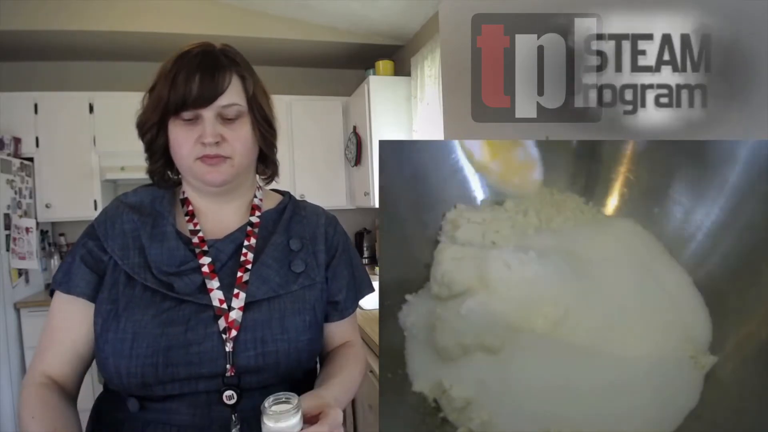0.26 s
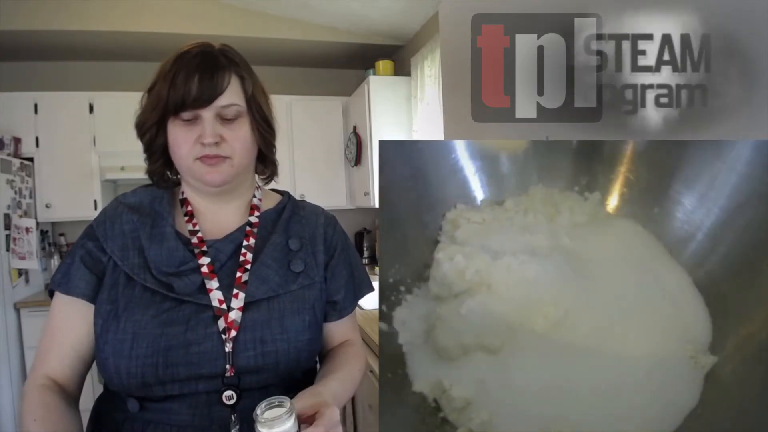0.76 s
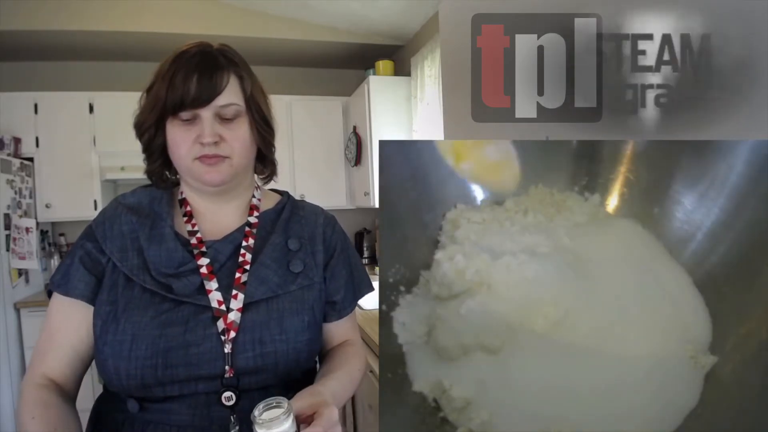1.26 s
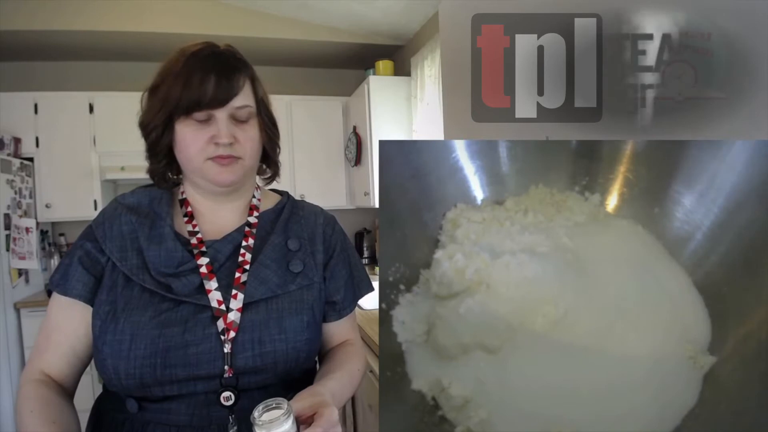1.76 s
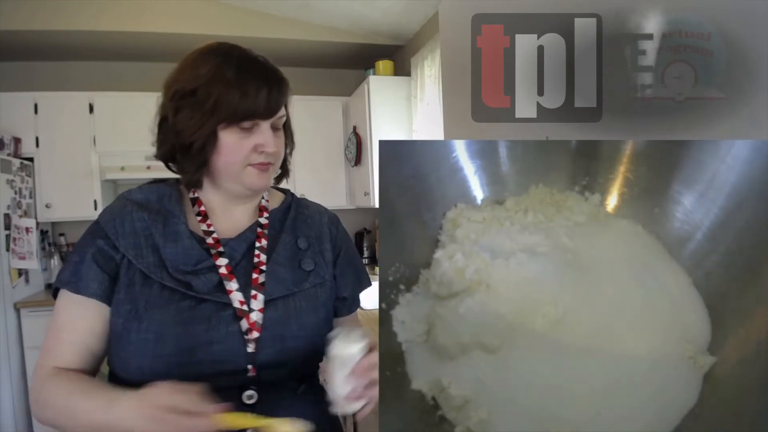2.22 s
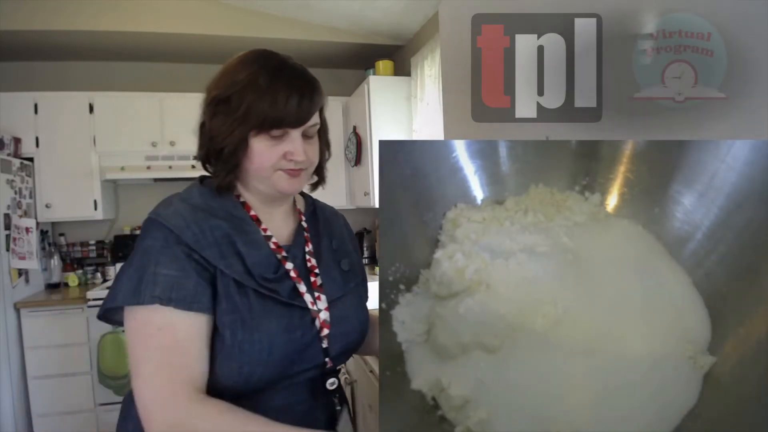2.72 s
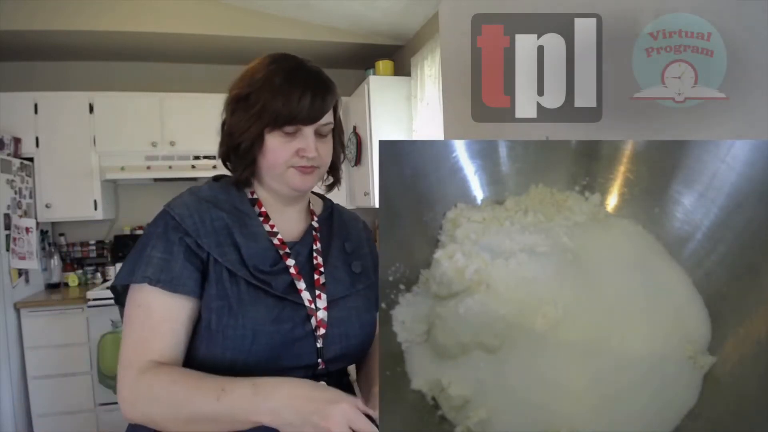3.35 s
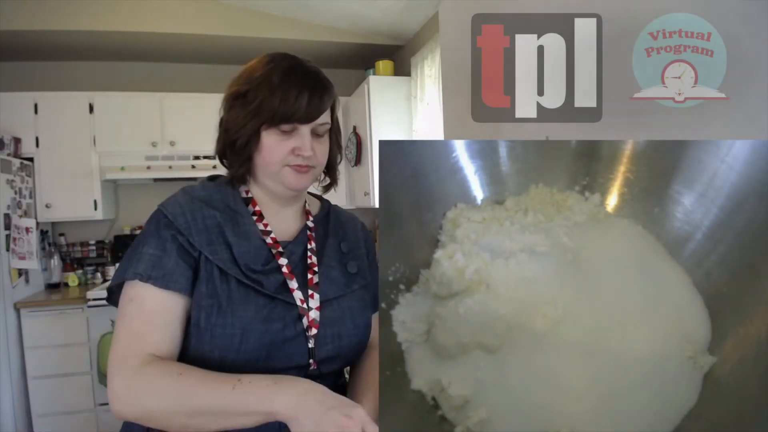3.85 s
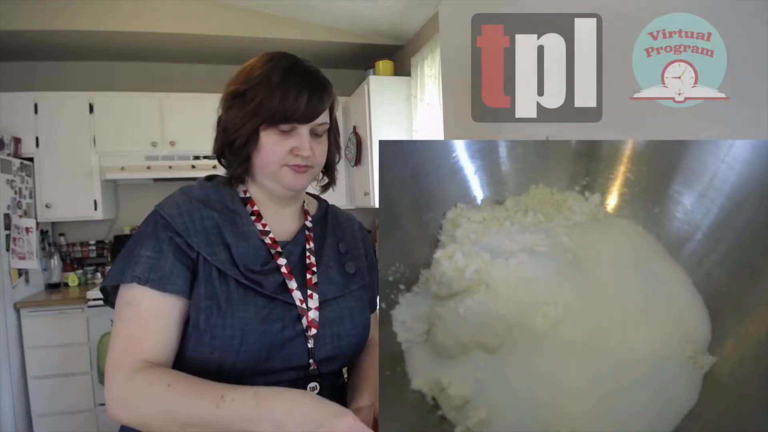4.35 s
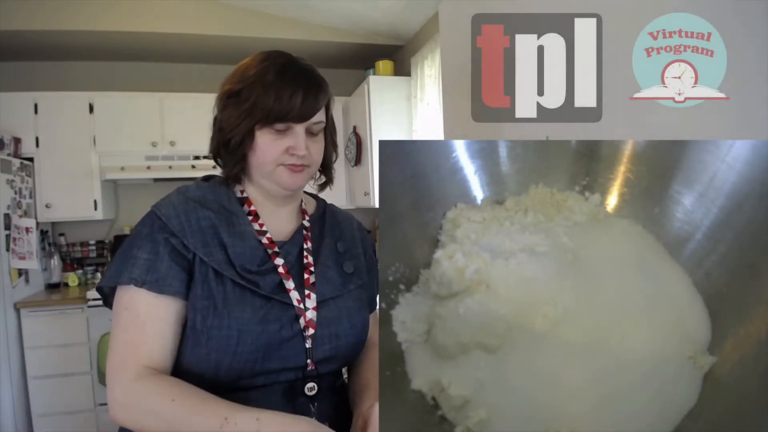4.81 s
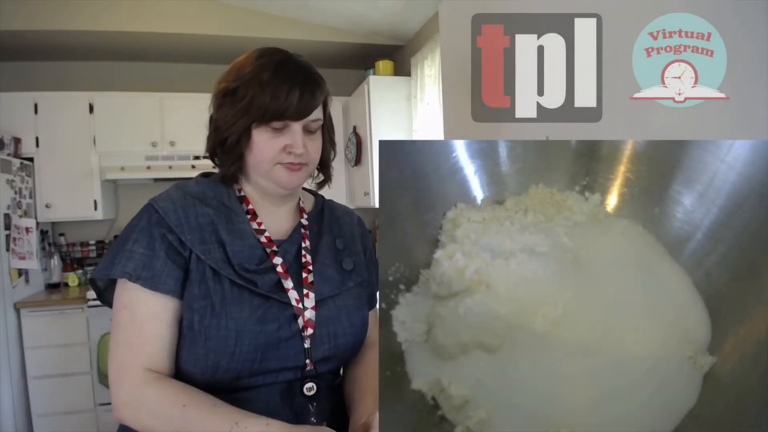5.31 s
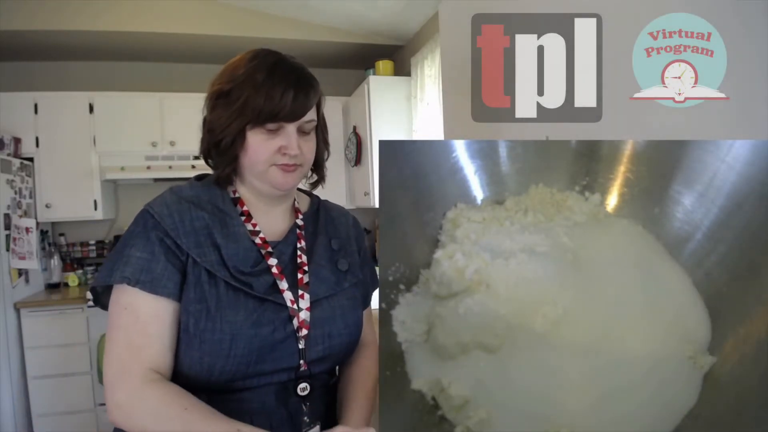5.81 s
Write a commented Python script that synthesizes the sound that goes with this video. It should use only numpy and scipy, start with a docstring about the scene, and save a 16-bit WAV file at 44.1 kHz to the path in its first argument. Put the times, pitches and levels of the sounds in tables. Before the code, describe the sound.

A plastic spoon taps ten times on a ringing steel mixing bowl, then a jar, lid and spoon clatter onto a kitchen counter.

```python
"""Small hard kitchen: a plastic measuring spoon is tapped ten times on the rim of a steel mixing bowl.
Then jar, lid and spoon are set down and handled on the counter; a badge clip jingles over a faint room hum.
Steel, jar glass and clip are sums of decaying modes; knocks are coloured noise with room decay.
Ticks are a damped note plus a noise crack; the hum is patchy filtered noise. Many blows swell in over 10-30 ms."""
import sys
import numpy as np
from scipy import signal
from scipy.fft import rfft, irfft, next_fast_len
from scipy.io import wavfile
from scipy.ndimage import uniform_filter1d

SR = 44100
rng = np.random.default_rng(int(sys.argv[2]) if len(sys.argv) > 2 else 0)


def wrap_up_sound(samples):
    """Save the sound to the file named by the first command line argument, as 16-bit audio."""
    columns = np.atleast_2d(samples).T
    # keep every value between -1 and 1, then stretch to whole-number steps
    tamed = np.clip(columns, -1, 1)
    steps = np.round(tamed * 32767).astype(np.int16)
    wavfile.write(sys.argv[1], SR, steps)


N = 267731
TIME = np.arange(SR) / SR  # one second

# Room decay. Each row: frequency in Hz, T60 in seconds before the length factor.
KITCHEN_T60 = [(150, 0.55), (500, 0.63), (2000, 0.54), (5000, 0.44), (10000, 0.33), (16000, 0.16)]
# Room noise colour. Each row: frequency in Hz, relative level in dB.
HUM_SPECTRUM = [(18, -74.5), (30, -74.5), (138, -1.5), (801, -6), (866, -18), (1010, -11.5), (4190, -18.5),
                (4530, -21), (5450, -22.5), (13000, -30), (16000, -35.5)]
# Room noise envelope. Each row: time in seconds, level in dB.
HUM_LEVEL = [(0, -70), (.35, -66), (1.598, -67), (3.198, -60), (3.6, -67.5), (4.3, -64), (4.7, -65.5),
             (4.948, -71.5), (5.7, -68), (6.07, -60.5)]

# Metal chinks. Each row: start in seconds, level in dB, lowest mode in Hz, highest mode in Hz.
CHINKS = [(.268, -74.5, 5670, 7500), (2.76, -88, 15100, 15200), (2.811, -76.5, 10850, 11500),
          (2.852, -69, 11000, 11350), (2.87, -78, 15200, 15540), (3.44, -64, 8230, 12500),
          (3.46, -61, 8900, 15700), (4.525, -62.5, 8100, 12760), (4.58, -70, 8500, 12400),
          (4.629, -68, 8180, 12200)]
# Small dry ticks. Each row: time in seconds, level in dB, pitch in Hz, treble in dB.
TICKS = [(0.106, -59, 4300, -27), (0.1525, -55, 4360, -31), (.1894, -59, 4200, -25),
         (0.209, -53, 4420, -31), (.226, -60, 4400, -25), (0.2554, -48, 4420, -31), (.2796, -50, 4470, -14),
         (.338, -65, 4400, -22), (2.3732, -28.5, 1970, -29), (2.84, -33, 1540, -19), (3.17, -33, 2320, -21),
         (3.272, -51, 2170, -5), (3.3516, -45, 1950, -19), (3.423, -44.5, 1510, -24),
         (3.689, -25.5, 1480, -16), (3.7748, -27, 2010, -23), (3.803, -26.5, 1910, -28),
         (3.917, -48, 1840, -15), (3.9494, -37, 1880, -22), (4.135, -33, 2410, -10), (4.398, -43, 2720, -6),
         (4.749, -52, 1850, 1), (5.7404, -38.5, 2000, -22), (5.7935, -42, 1640, -14),
         (6.0479, -43, 2630, -11)]
# Spoon brushing the glass jar. Each row: mode in Hz, strength in dB, T60 in seconds.
CLINK_MODES = [(2280, -4, 0.2), (2940, -13, 0.19), (3810, -7.5, 0.19), (5400, 7, 0.042),
               (6400, 12.5, 0.082), (6960, -5, 0.1), (7730, -12, 0.13), (8130, -6, 0.078),
               (8586, -4, 0.083)]
# The brush itself: start in seconds, level in dB, swell in seconds.
CLINK_EVENT = (0.016, -46.5, 0.02)

# Dull knocks on the counter. Each row: start in seconds, level in dB, swell in seconds, tail length factor,
# treble in dB, own note in Hz, boost of that note in dB.
THUMPS = [(3.664, -25.5, 0.023, 0.57, -7, 650, 4), (3.69, -24, 0.0024, 0.85, -8, 506, 1),
          (3.822, -24, 0.0051, 0.6, -16.5, 2090, 4.5), (4.79, -60, 0.0096, 0.56, -1.5, 680, 0.5),
          (5.011, -47.5, 0.0014, 0.72, -0.5, 680, -1.5), (5.52, -43.5, 0.0086, 0.64, -7.5, 660, 11),
          (5.593, -42, .0034, 0.37, 5, 512, 24.5), (5.743, -45, 0.0034, 0.94, 3, 2100, 20),
          (5.821, -37.5, 0.0031, 0.45, -15, 503, 7.5), (5.905, -48, 0.004, 0.81, 5, 656, 9),
          (6.011, -51, 0.01, .97, -8, 405, 11)]
# Jar and lid set down. Each row: columns as in THUMPS.
CLACKS = [(2.378, -34, 0.0092, 0.59, -55, 1107, 12.5), (2.542, -26, 0.032, .98, 1.2, 1500, -1),
          (2.638, -26, 0.0094, 0.96, -3.5, 3320, 7), (2.838, -47, .013, .98, 0, 2800, 7),
          (2.915, -23, 0.029, 0.91, 6, 1780, -2), (4.085, -35, 0.018, 0.73, 7, 1360, 12.5),
          (4.133, -43, 0.0024, .58, 20.5, 1363, 24), (4.395, -49, 0.0058, 0.58, -19, 1390, 16),
          (4.4, -53.5, 0.0071, 0.22, 10, 2630, 41), (5.958, -48.5, 0.015, 0.57, 12.5, 2760, 20.5),
          (6.044, -59, 0.0025, .91, 9, 2900, 7)]
# Bright cracks of a plastic tub. Each row: columns as in THUMPS.
CRACKS = [(5.134, -39.5, .03, 0.9, -2, 8940, 9), (5.244, -36.5, .02, 0.82, 5.5, 3860, 1.5),
          (5.3405, -29.5, 0.0015, 1.08, 0.4, 4100, 5)]
# Kinds of knock. Each holds: bass in dB, relative width of a note at 1 kHz, power by which higher notes widen.
THUMP_KIND = (0.96, 0.12, 0.71)
CLACK_KIND = (-0.5, 0.036, 2.34)
CRACK_KIND = (.1, 0.089, .05)
# Body colours. Each row: frequency in Hz, relative level in dB.
COUNTER_SPECTRUM = [(35, -83), (60, -89.5), (130, -20.5), (354, -1), (458, -7.5), (682, -4.5), (785, -18),
                    (1470, -21), (2840, -35.5), (4970, -37.5), (6740, -51), (8920, -37.5), (16000, -72)]
JAR_SPECTRUM = [(71, -64), (120, -75), (192, -13), (436, -6), (789, -12), (856, -8), (1140, -10.5),
                (1490, 0), (2150, -11), (3310, -10.5), (3590, -14.5), (11500, -24), (16000, -25.5)]
TUB_SPECTRUM = [(71, -64), (120, -37), (312, -3.5), (563, -7), (704, -3), (764, -10), (1150, -11.5),
                (1650, -17), (4220, -15), (5610, -17.5), (10500, -12), (15500, -17)]
# Low modes of the counter top. Each row: mode in Hz, strength in dB, T60 in seconds before the length factor.
COUNTER_MODES = [(225, -6, .2), (300, -3, .2), (362, 0, .22), (443, -1, .2), (520, -4, .18), (580, -5, .16),
                 (676, -4, .2)]

# Spoon taps on the rim. Each row: start in seconds, level in dB, swell in seconds, thud into the counter in dB,
# treble in dB, sustained ring in dB.
TAPS = [(0.383, -42, .023, -2, -3.5, 1), (.508, -28.5, 0.023, -3.5, -7, -5),
        (0.666, -28, 0.026, -5, -0.5, 3.5), (.786, -28.5, 0.019, -6, 1, -3),
        (.939, -27.5, 0.021, -5.5, -3.5, -20.5), (1.084, -36.5, .015, -1, -3, -12),
        (1.207, -29, 0.027, -3.5, -0.5, -13), (1.668, -31, 0.032, 3.5, 2, 11.5),
        (1.843, -30.5, 0.025, 2.5, -3, 1.5), (1.983, -33.5, 0.016, 5.5, -6, 15.5)]
# Bowl modes. Each row: frequency in Hz.
BOWL_HZ = [792, 848, 925, 1220, 1462, 1740, 1800, 1980, 2275, 2506, 2611, 2988, 3070, 3108, 3567, 3821,
           3968, 4255, 4730, 5346, 5710, 5990, 6340, 6505, 6870, 7370, 7635, 7930, 8170, 8590]
# Same modes. Each row: strength in dB, T60 in seconds before TAP_TAIL.
BOWL_DECAY = [(-12, 0.27), (-5.5, 0.4), (-12, 0.23), (-10.5, 0.072), (-11, 0.8), (-3, 0.049), (-9.5, 0.15),
              (-9, 0.4), (-0.5, 0.1), (-1.5, 0.1), (-14.5, 0.2), (-1, 0.14), (3.5, 0.12), (-8, 0.35),
              (-15, 0.4), (1, 0.095), (-25.5, 1), (-12, 0.12), (-4, 0.071), (-21, 0.27), (-21, 0.073),
              (-33.5, 0.089), (-22, 0.64), (-9.5, 0.094), (-48, 0.18), (-11, 0.086), (-26, 0.75),
              (-20, 0.12), (-22, 0.13), (-13, 0.077)]
# Rim modes that sing on. Each row: frequency in Hz.
SINGING_HZ = [865, 1462, 1978, 4458]
# Same rim modes. Each row: strength in dB, T60 in seconds.
SINGING_DECAY = [(-18.5, 3.1), (-27.5, 1.06), (-24.5, 0.58), (-32.5, 0.55)]
# The singing is cut short: time in seconds, gain from then on in dB.
SINGING_CUT = (2.372, -12)
# Dense modes of the bowl wall. Each row: frequency in Hz, relative level in dB.
WALL_SPECTRUM = [(300, -14), (700, -11), (1300, -8.5), (2500, 1.5), (4500, -11.5), (7000, 2), (10000, -9.5),
                 (16000, -21)]
# Counter under the bowl. Each row: frequency in Hz, relative level in dB.
FOOT_SPECTRUM = [(60, -58.5), (130, -14.5), (220, -6.5), (370, 0), (450, -1), (600, -15.5), (800, -10),
                 (1200, -25), (3000, -43)]

SCATTER_DB, WAVER_HZ = 3, 46.5  # spread of mode strengths; rate of new random waver values
CHINK_T60_S, CHINK_SHORTENS = 0.18, 0.63  # T60 at about 1 kHz spread; power by which wider ones die sooner
TICK_T60_S_PER_KHZ, TICK_BASS_DB = 0.0059, -6.5  # higher ticks ring longer; crack level at 500 Hz
LOW_DB_PER_THUD_DB, LOW_DB = 1.96, 1.96  # a tap that thuds more stirs the low modes more; offset
TAP_TAIL = 0.81  # length factor
BASS_CUT_HZ, TOP_HZ, EDGE_HZ = 85, 15950, 250


def amp(db):
    """Amplitude of a level in dB."""
    return 10 ** (np.asarray(db) / 20)


def unit(x):
    """x at rms 1."""
    return x / np.sqrt(np.mean(x ** 2) + 1e-20)


def along(points, hz):
    """(Hz, value) points interpolated on a log frequency axis."""
    f, v = np.transpose(points)
    return np.interp(np.log(hz + 1), np.log(f + 1), v)


def filtered(x, response):
    """x times a response of frequency."""
    m = next_fast_len(len(x) + 8192)
    spectrum = rfft(x, m) * response(np.fft.rfftfreq(m, 1 / SR))
    return irfft(spectrum, m)[:len(x)]


def add(out, start_s, sound):
    """Mixes a sound in at start_s."""
    part = out[max(round(start_s * SR), 0):][:len(sound)]
    part += sound[:len(part)]


def swell(rise_s):
    """A quick start well below full level, then a steady climb in dB over rise_s."""
    climb = np.clip(TIME / max(rise_s, 1e-4), 0, 1)
    return amp(-23 * (1 - climb)) * np.clip(4 * climb, 0, 1)


def dip(out, start_s, rise_s):
    """Earlier tails dip as a new blow swells in: the part taken away."""
    old = np.pad(out, (0, SR))[round(start_s * SR):][:SR]
    return -.8 * (1 - swell(rise_s)) * old


def ring(modes, t, scatter_db, waver=0):
    """Decaying modes at random strengths and phases; random waver stands for beating close neighbours."""
    out = np.zeros(len(t))
    knots = np.arange(int(t[-1] * WAVER_HZ) + 2)
    for hz, db, t60_s in modes:
        in_phase, quadrature = [
            waver * np.interp(t * WAVER_HZ, knots, rng.standard_normal(len(knots))) for _ in range(2)]
        phase = 2 * np.pi * (hz * t + rng.random())
        decay = amp(db + rng.normal(0, scatter_db) - 60 * t / t60_s)
        out += decay * ((1 + in_phase) * np.sin(phase) + quadrature * np.cos(phase))
    return out


def echoes(colour_db, length=0.97):
    """A blow of the given colour heard as room echoes: each band dies at its own speed, start rms 1."""
    hz, t, z = signal.stft(rng.standard_normal(SR), SR, nperseg=256)
    t60_s = length * along(KITCHEN_T60, hz)
    tail = signal.istft(z * amp(-60 * t / t60_s[:, None]), SR, nperseg=256)[1][:SR]
    tail = filtered(tail, lambda f: amp(colour_db(f)))
    return tail / np.std(tail[:SR // 40])


def roomy(x, direct_db):
    """x with its own echoes, which blur its lines."""
    wet = signal.fftconvolve(x, echoes(lambda f: 0 * f, length=0.87))[:SR]
    early = SR // 15
    return amp(direct_db) * x + wet * np.std(x[:early]) / np.std(wet[:early])


def thud(colour_db, length):
    """The counter top: its low modes over a dense dull tail."""
    modes = [(hz, db + colour_db(hz) - colour_db(362), length * t60_s) for hz, db, t60_s in COUNTER_MODES]
    knock = ring(modes, TIME, SCATTER_DB)
    return echoes(colour_db, length) + amp(-3.5) * knock / np.std(knock[:SR // 40])


def hum():
    """Room noise whose level is patchy in time and frequency."""
    z = signal.stft(rng.standard_normal(N), nperseg=512)[2]
    patches = uniform_filter1d(rng.standard_normal(z.shape), 5, 0)
    patches = uniform_filter1d(patches, 6, 1)
    air = signal.istft(z * amp(2.5 * unit(patches)), nperseg=512)[1][:N]
    coloured = unit(filtered(air, lambda f: amp(along(HUM_SPECTRUM, f))))
    time_s, level_db = np.transpose(HUM_LEVEL)
    return amp(np.interp(np.arange(N) / SR, time_s, level_db)) * coloured


def chinks():
    """Small metal parts touch: many scattered short modes."""
    out = np.zeros(N)
    for start_s, db, low_hz, high_hz in CHINKS:
        spread_khz = abs(high_hz - low_hz) * 1e-3
        t60_s = CHINK_T60_S * (spread_khz + .01) ** -CHINK_SHORTENS
        modes = [(hz, 0, t60_s) for hz in low_hz + (high_hz - low_hz) * rng.random(size=20)]
        add(out, start_s, amp(db) * swell(0.019) * ring(modes, TIME, 2 * SCATTER_DB, waver=1.2))
    return out


def ticks():
    """A short damped note with a noise crack around it."""
    out, t = np.zeros(N), TIME[:SR // 20]
    for time_s, db, hz, treble_db in TICKS:
        colour = [(100, TICK_BASS_DB - 28), (500, TICK_BASS_DB), (hz, 0),
                  (2.0 * hz, treble_db), (16000, treble_db - 9.5)]
        puff = amp(-60 * t / (TICK_T60_S_PER_KHZ * hz * 1e-3)) * swell(0.0012)[:len(t)]
        crack = filtered(puff * rng.standard_normal(len(t)), lambda f: amp(along(colour, f)))
        crack = crack / np.max(np.abs(crack))
        note = puff * np.sin(2 * np.pi * hz * t)
        add(out, time_s - .001, amp(db) * (0.96 * note + 0.72 * crack))
    return out


def clink():
    """One light glassy touch: a few wavering modes of the jar."""
    out, (start_s, db, rise_s) = np.zeros(N), CLINK_EVENT
    add(out, start_s, amp(db) * swell(rise_s) * ring(CLINK_MODES, TIME, SCATTER_DB / 2, waver=1.0))
    return out


def knocks(events, kind, spectrum, body):
    """Blows that hardly ring: the object's colour with a note of its own, decaying in the room."""
    out, (bass_db, width, wider) = np.zeros(N), kind
    for start_s, db, rise_s, length, treble_db, own_hz, own_db in events:
        tilt = [(700, bass_db), (1300, 0), (1900, 0), (8000, treble_db)]
        spread = width * (own_hz * 1e-3) ** wider

        def colour_db(f):
            """Body colour, tilt and own note."""
            own_note = own_db * np.exp(-(np.log((f + 1) / own_hz) / spread) ** 2)
            return along(spectrum, f) + along(tilt, f) + own_note

        blow = amp(db) * swell(rise_s) * body(colour_db, max(length, .02))
        add(out, start_s, dip(out, start_s, rise_s) + blow)
    return out


def thumps():
    """Dull knocks that excite the counter's low modes."""
    return knocks(THUMPS, THUMP_KIND, COUNTER_SPECTRUM, thud)


def clacks():
    """Jar and lid set down: jar colour in room echoes."""
    return knocks(CLACKS, CLACK_KIND, JAR_SPECTRUM, echoes)


def cracks():
    """Plastic tub: bright noise in room echoes."""
    return knocks(CRACKS, CRACK_KIND, TUB_SPECTRUM, echoes)


def bowl():
    """Each tap rings the steel, thuds through its foot into the counter and feeds the singing rim modes."""
    out, singing = np.zeros(N), np.zeros(N)
    long = np.arange(2 * SR) / SR
    rim = [(hz, db, t60_s) for hz, (db, t60_s) in zip(SINGING_HZ, SINGING_DECAY)]
    for start_s, db, rise_s, thud_db, treble_db, sing_db in TAPS:
        low_db = LOW_DB + LOW_DB_PER_THUD_DB * thud_db
        tilt = [(1100, low_db), (2200, 0), (4000, 0.0068), (9000, treble_db)]
        modes = [(hz, mode_db + along(tilt, hz), TAP_TAIL * t60_s)
                 for hz, (mode_db, t60_s) in zip(BOWL_HZ, BOWL_DECAY)]
        steel = amp(-3) * roomy(ring(modes, TIME, SCATTER_DB / 2, waver=0.37), direct_db=4)
        wall = amp(-9.5) * echoes(lambda f: along(WALL_SPECTRUM, f) + along(tilt, f), TAP_TAIL)
        foot = amp(thud_db) * thud(lambda f: along(FOOT_SPECTRUM, f), TAP_TAIL)
        add(out, start_s, dip(out, start_s, rise_s))
        add(out, start_s, amp(db) * swell(rise_s) * (steel + wall + foot))
        singing[round(start_s * SR):] *= .3  # the spoon's touch stills most of the old ring
        build_up = 1 - np.exp(-long / 0.049)
        add(singing, start_s, amp(db + sing_db) * build_up * ring(rim, long, SCATTER_DB / 2))
    cut_s, cut_db = SINGING_CUT
    singing[round(cut_s * SR):] *= amp(cut_db)
    return out + singing


def scene():
    """One microphone feeds both channels."""
    mono = hum() + chinks() + ticks() + clink() + thumps() + clacks() + cracks() + bowl()
    return np.array([mono, mono])


def record(dry):
    """The microphone drops the deep bass; nothing is kept above the band limit."""
    def band(hz):
        """Bass cut times upper band edge."""
        bass_cut = hz ** 2 / np.hypot(hz ** 2, BASS_CUT_HZ ** 2)
        return np.clip((TOP_HZ - hz) / EDGE_HZ, 0, 1) ** 2 * bass_cut

    return np.array([filtered(x, band) for x in dry])


dry = scene()
out = record(dry)
wrap_up_sound(out)
```